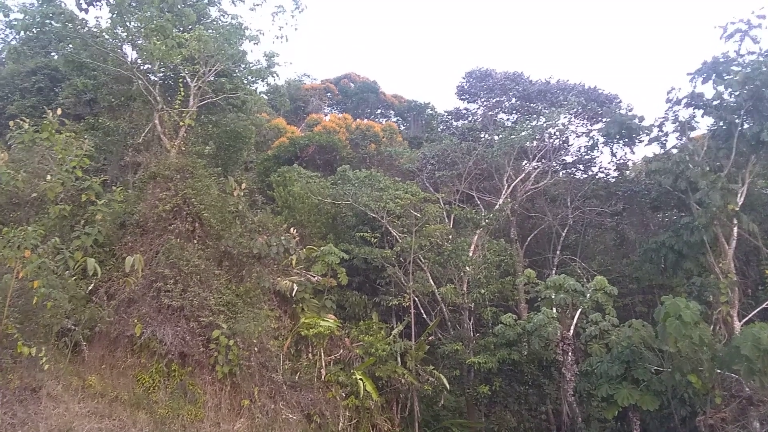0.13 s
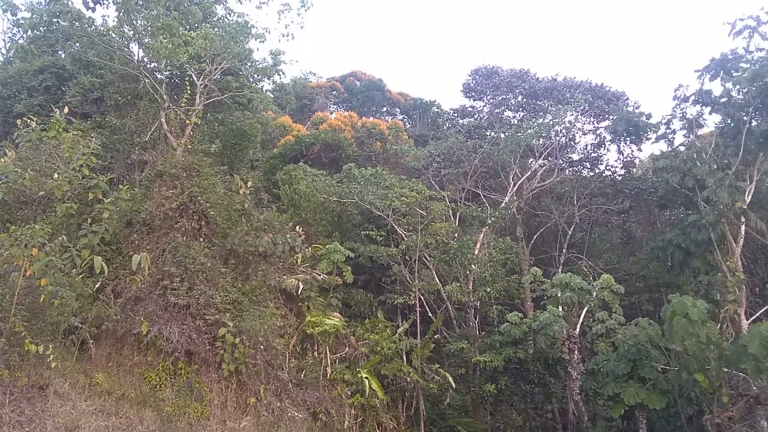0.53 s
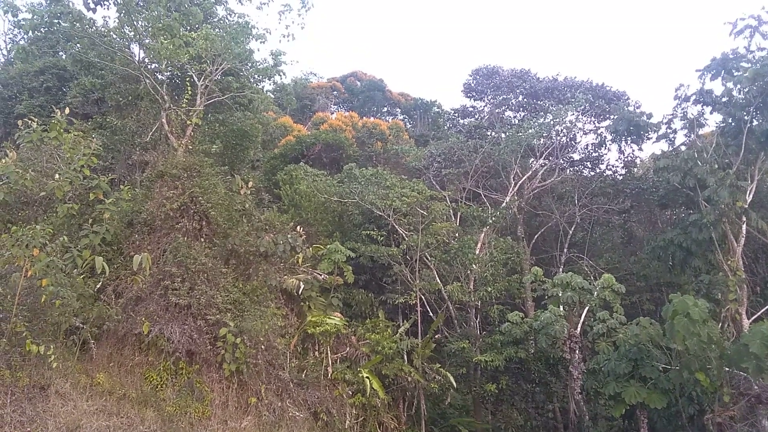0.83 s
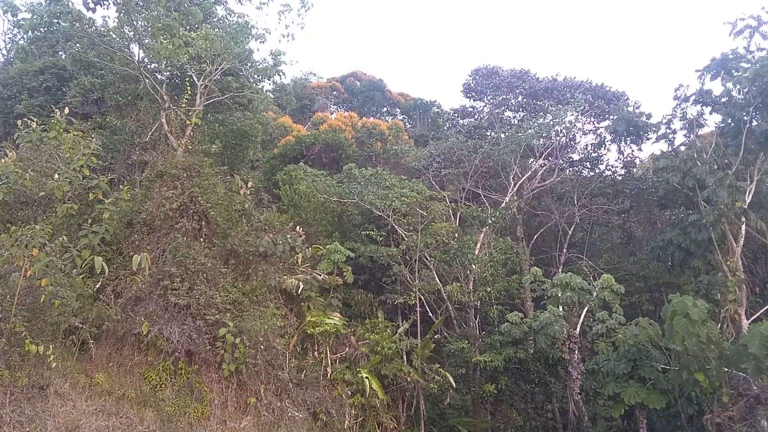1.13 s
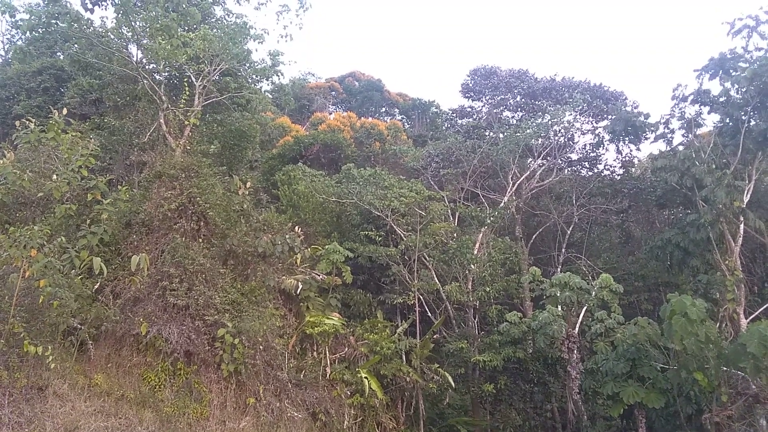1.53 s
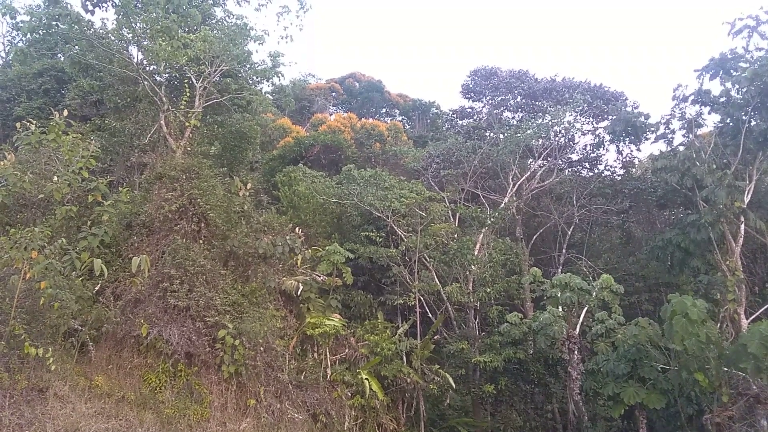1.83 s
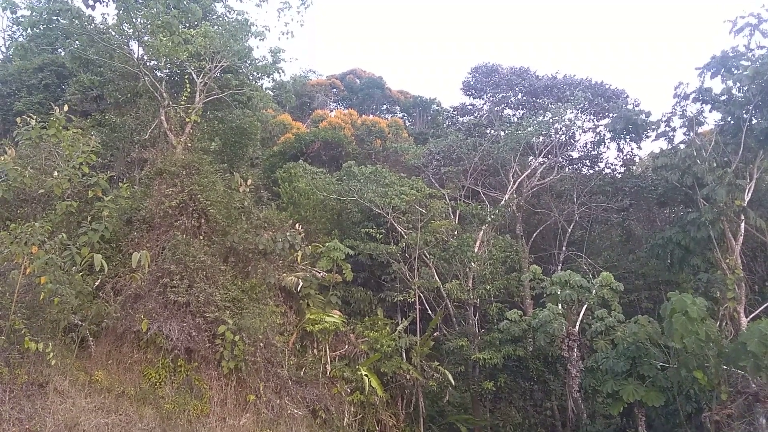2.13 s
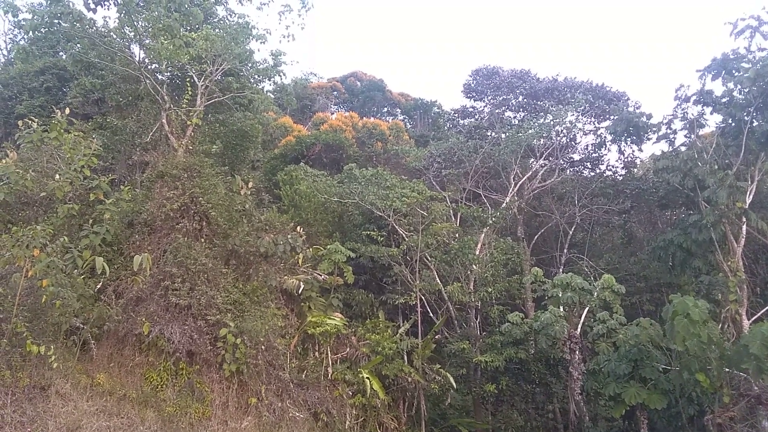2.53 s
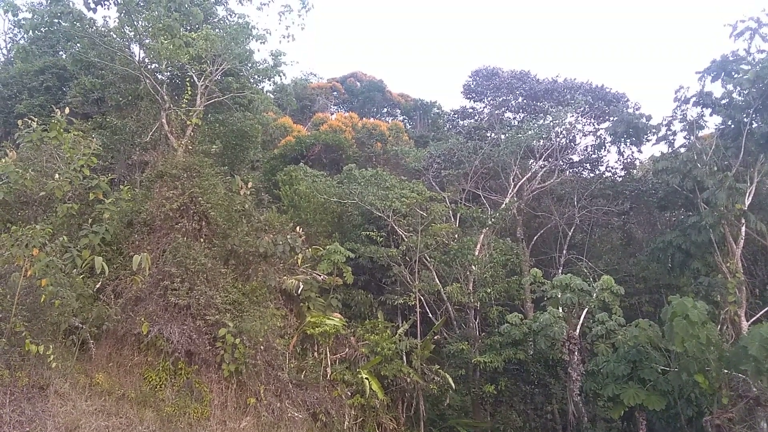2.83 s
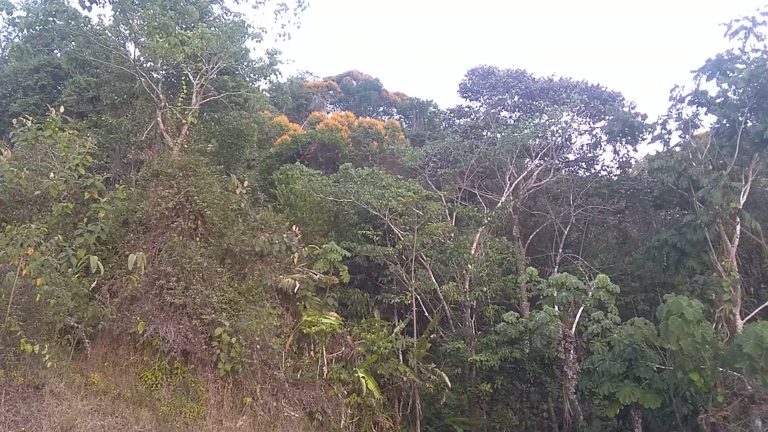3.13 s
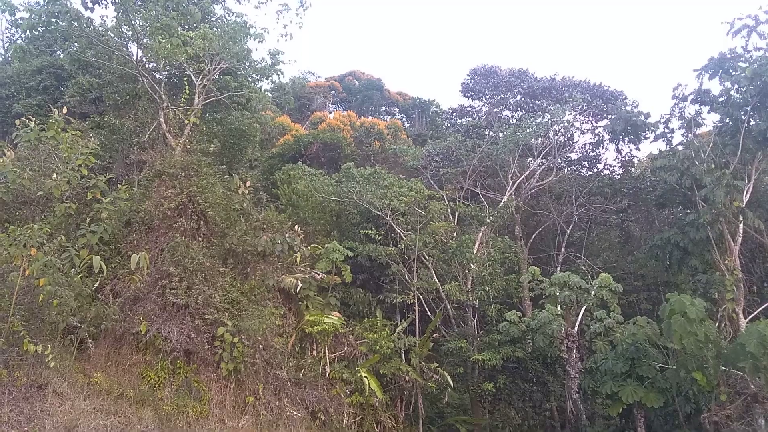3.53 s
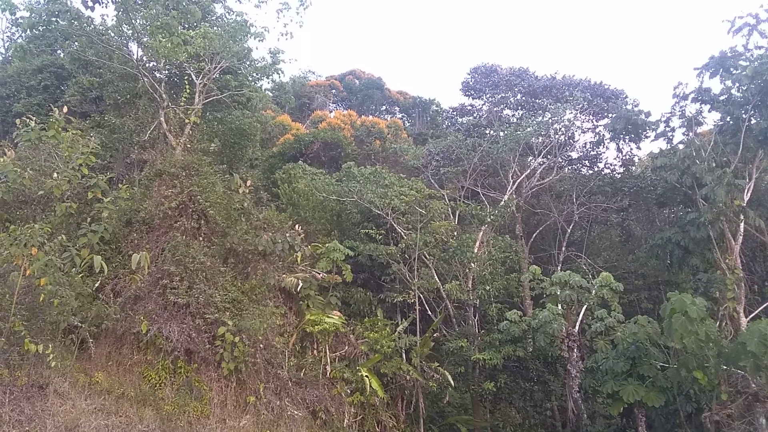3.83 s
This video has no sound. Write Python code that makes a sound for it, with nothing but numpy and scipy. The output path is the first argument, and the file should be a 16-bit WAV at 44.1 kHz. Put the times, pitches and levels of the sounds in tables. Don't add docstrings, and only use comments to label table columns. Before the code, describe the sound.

Howler monkeys, far off in tropical forest, end overlapping gruff roars with one held hoot, then alternate falling pants until they stop; a pulsing cicada and insect hiss continue, with faint bird chirps last, in wide stereo.

```python
import sys
import numpy as np
from scipy import signal
from scipy.io import wavfile
from scipy.ndimage import uniform_filter1d

SR = 44100
rng = np.random.default_rng(int(sys.argv[2]) if len(sys.argv) > 2 else 0)


def gain_from_db(level_db):
    decades = np.asarray(level_db, float) / 20
    return 10 ** decades


def master(y):
    cut = np.clip(np.atleast_2d(y).T, -1, 1)
    pcm = np.round(cut * 32767)
    wavfile.write(sys.argv[1], SR, pcm.astype(np.int16))


N = 176400
T = np.arange(N) / SR
LEAD_IN_S = 0.5


def evened(x):
    return x / np.sqrt(np.mean(x ** 2) + 1e-20)


def read(points, hz):
    f, value = np.transpose(points)
    return np.interp(np.log(hz + 1), np.log(f + 1), value)


def resonate(x, hz, width):
    turn = np.exp(2j * np.pi * np.cumsum(hz * np.ones(len(x))) / SR)
    r = np.exp(-np.pi * width / SR)
    smooth = signal.lfilter([(1 - r) ** 2], [1, -2 * r, r * r], x / turn + 1e-18)
    return 2 * (turn * smooth).real


def hiss(shape, same, lead_s, pan_db, patchy_db):
    frames, hz = N // 256 + 5, np.fft.rfftfreq(1024, 1 / SR)
    a, b, c, d, patches = rng.standard_normal((frames, 513, 5)).T
    patches = uniform_filter1d(uniform_filter1d(patches, size=14, axis=0), size=14, axis=1)
    like = np.clip(read(same, hz), -1, 1)[:, None]
    left = a + 1j * b
    delayed = left * np.exp(-1j * 2 * np.pi * lead_s * hz)[:, None]
    right = like * delayed + np.sqrt(1 - like ** 2) * (c + 1j * d)
    inside = (hz >= shape[0][0] * .8) & (hz <= min(shape[-1][0] * 1.1, 14240))
    colour_db = (read(shape, hz) - 60 * ~inside)[:, None]
    z = np.array([left, right]) * gain_from_db(colour_db + patchy_db * evened(patches))
    sound = signal.istft(z, nperseg=1024, noverlap=768)[1][:, :N]
    return evened(sound) * gain_from_db(np.array([[pan_db / 2], [-pan_db / 2]]))


def syllable(start, length, effort_db, hz, rough, throat, arch, glide, chance):
    growl_hz, growl_depth, jitter, breath = 31.9, 0.51, 0.35, 3
    attack_s, fall_s, wander = .015, 0.027, .018
    t = T[:len(chance[0])]
    rough = np.clip(rough * .82, 0, 1)
    bend = arch * (np.sin(np.pi * np.clip(t / length, 0, 1)) - .6)
    tract = hz * (1 + bend + glide * (np.minimum(t / length, 1.2) - .5))
    drift = evened(uniform_filter1d(uniform_filter1d(chance[1], size=1500), size=1500))
    tract = tract * (1 + wander * rough * drift)
    wobble = evened(uniform_filter1d(chance[0], size=300))
    turns = np.cumsum(tract * throat[0][0] * (1 + jitter * rough ** 2 * wobble / 4)) / SR
    folds = sum(np.cos(2 * np.pi * k * turns) for k in range(1, 5) if k * hz < 2000)
    unsteady = evened(uniform_filter1d(chance[1], size=900))
    shake = np.cumsum(growl_hz * (1 + jitter * unsteady)) / SR
    growl = 1 + growl_depth * np.sqrt(rough) * np.cos(2 * np.pi * shake)
    drive = growl * ((1 - rough) * evened(folds) + breath * rough * chance[2])
    voice = 0
    for k, (ratio, width, db) in enumerate(throat):
        voice = voice + (-1) ** k * gain_from_db(db) * evened(resonate(drive, ratio * tract, width))
    shape = np.clip(t / attack_s, 0, 1) * np.exp(-np.maximum(t - length + fall_s, 0) / fall_s)
    return gain_from_db(effort_db) * shape * voice


def calls(rows, throat, arch, glide):
    out, size = np.zeros(N + 2 * SR), SR // 2
    for row in rows:
        at = round((row[0] + LEAD_IN_S) * SR)
        out[at:at + size] += syllable(*row, throat, arch, glide, rng.standard_normal((3, size)))
    return out


def note(curve, overtone_db):
    s, hz, db = np.transpose(curve)
    t = np.arange(N + 2 * SR) / SR - LEAD_IN_S
    waver = 1 + 0.006 * evened(uniform_filter1d(rng.standard_normal(len(t)), size=600))
    a = 2 * np.pi * np.cumsum(np.interp(t, s, hz) * waver) / SR
    onset = np.clip((t - s[0]) / 0.012 + (s[0] <= 0), 0, 1)
    edge = np.clip((s[-1] - t) / 0.011, 0, 1) * onset
    tone = np.sin(a) + gain_from_db(overtone_db) * np.sin(2 * a)
    return np.sqrt(2) * gain_from_db(np.interp(t, s, db)) * edge * tone


SAG = 0.0401
# start_s, length_s, effort_db, first_resonance_hz, roughness_0_to_1
ROARS = [(-.1, 0.23, -36.5, 427.7, 0.68), (.16, 0.064, -43, 433, 0.99), (.255, 0.042, -33.5, 416.6, 0.51),
         (.31, 0.052, -38, 422, 0.78), (.36, 0.087, -35.5, 410.3, 0.52), (.44, 0.0973, -36.5, 431.2, 0.78),
         (.55, 0.052, -36.5, 432.6, 0.7), (.625, 0.047, -38, 413, 0.74), (.71, 0.096, -37, 413, 0.79),
         (.8, 0.071, -36.5, 399.2, 0.61), (.96, 0.059, -38.5, 385, 0.62), (1.03, 0.057, -41.5, 383.5, 0.78),
         (1.14, 0.096, -41, 397, 0.92), (1.22, 0.088, -43, 383, 0.88)]
# ratio_to_first, width_hz, level_db
ROAR_THROAT = [(1, 117, 1.5), (1.33, 420, -10), (2.015, 270, -8), (0.612, 103, -19.5), (3.15, 170, -23)]


def roars():
    return calls(ROARS, ROAR_THROAT, arch=SAG, glide=-.03)


# start_s, length_s, effort_db, main_resonance_hz, roughness_0_to_1
CRIES = [(-.1, 0.25, -38.5, 904.4, 0.63), (.16, 0.12, -39.5, 960, 0.88), (.26, 0.21, -33, 871.4, 0.73),
         (.46, 0.12, -40, 825, 0.28), (.56, 0.045, -40, 900, 0.72), (.595, 0.038, -37, 948, 0.7),
         (.645, 0.059, -33.5, 825, 0.77), (.64, 0.054, -41.5, 995, 0.36), (0, 0.058, -40, 1026, 0.9),
         (.72, 0.12, -50, 838, 0.88), (.88, 0.17, -49.5, 865, 1), (1.12, 0.15, -45.5, 881, 1.02)]
# ratio_to_main, width_hz, level_db
CRY_THROAT = [(1, 60, -7), (1.139, 80, -18), (1.6, 40, -22.5), (0.6, 405, -13)]


def cries():
    return calls(CRIES, CRY_THROAT, arch=.015, glide=-.02)


# start_s, length_s, effort_db, resonance_hz, roughness_0_to_1
HOOTS = [(.28, 0.219, -52.5, 1397, 0.25), (.67, 0.099, -54.5, 1373, 0.66), (.99, 0.15, -60, 1350, 0.85),
         (-.1, 0.25, -53, 1300, 0.77), (.1, 0.2, -47, 288.5, 0.53), (.88, 0.049, -44, 284.5, 0.52),
         (1.1, 0.14, -53.5, 264.5, 0.2), (1.42, 0.102, -61.5, 1410, 0.64), (1.61, 0.087, -61, 1404, 0.69),
         (1.83, 0.065, -63.5, 1400, 0.77), (2.18, 0.088, -66, 1340, 0.9)]
# ratio, width_hz, level_db
PLAIN_THROAT = [(0.98, 156, -0.5)]


def hoots():
    return calls(HOOTS, PLAIN_THROAT, arch=SAG, glide=.03)


# start_s, length_s, level_db, pitch_hz, roughness_0_to_1
BIRDS = [
    (-.1, 0.23, -54, 2250, 0.5),
    (.2, 0.36, -67.5, 2200, .8),
    (.55, 0.25, -76, 2220, 0.7),
    (3.51, 0.071, -74, 1673, 0.27),
    (3.55, 0.06, -63.5, 1544, .3),
    (3.66, 0.05, -65.5, 1750, 0),
    (3.63, 0.035, -72, 1540, 0.2),
    (3.7, 0.091, -66.5, 1543, 0.38),
    (3.8, 0.046, -73, 1540, 0.45),
]


def birds():
    return calls(BIRDS, PLAIN_THROAT, arch=SAG, glide=0)


# time_s, pitch_hz, level_db
DRONE = [
    (0.0, 219, -45.5),
    (0.098, 187, -50.5),
    (0.2, 214, -60),
]


def drone():
    return note(DRONE, overtone_db=-29)


# frequency_hz, likeness_0_to_1
INSECT_SAME = [(2200, 0.067), (4500, 0.19), (9000, 0.051), (14000, 0.084)]
# frequency_hz, density_db_per_hz
BRIGHT = [(4410, -24), (7500, -55), (8380, -2), (8980, 2.5), (10000, 4), (10600, 1), (12400, 2.5),
          (14100, -8)]
# frequency_hz, density_db_per_hz
BUZZ = [(1760, -13.5), (3000, -23), (3410, 3), (4250, 15), (4700, 7), (5100, 5.5), (5900, 3), (6500, 0.5),
        (8450, -33), (14300, -120)]
# time_s, depth_0_to_1
PUMPS = [
    (-.2, .6),
    (.6, 0.88),
    (1.4, 0.86),
    (2.19, 0.93),
    (2.96, 0.94),
    (3.71, 1.),
]
# time_s, strength_0_to_1
FLUTTERS = [
    (.2, 1),
    (.9, .8),
    (1.86, 0.94),
    (2.63, 1.),
    (3.36, .8),
]


def cicada():
    bright_db, dip_db, buzz_db, rest_db = -52.5, -8.5, -49.5, -13
    pump_width_s, flutter_width_s, whine_lag_s, lead_s = 0.089, 0.077, 0.091, 15 / SR
    pump = sum(depth * np.exp(-.5 * abs((T - s) / pump_width_s) ** 3) for s, depth in PUMPS)
    bright = hiss(BRIGHT, INSECT_SAME, lead_s, pan_db=9.0, patchy_db=1.2)
    bright = bright * gain_from_db(bright_db + dip_db * pump)
    buzz = hiss(BUZZ, INSECT_SAME, lead_s, pan_db=7.0, patchy_db=1.2)
    buzz = buzz * gain_from_db(buzz_db + rest_db * (1 - pump ** .7))
    top = signal.sosfiltfilt(signal.butter(2, 12700, 'high', fs=SR, output='sos'), bright)
    bright = bright - np.clip(0.22 * pump, 0, 1) * top
    late = np.interp(T - whine_lag_s, T, pump)
    between = sum(strength * np.exp(-.5 * ((T - s) / flutter_width_s) ** 2) for s, strength in FLUTTERS)
    rub = rng.standard_normal((2, 2, N))
    whine = evened(np.array([resonate(r, hz=5660, width=210) for r in rub[0]]))
    whine = gain_from_db(-62) * (0.4 + late) * whine
    flutter = evened(np.array([resonate(r, hz=3890, width=630) for r in rub[1]]))
    flutter = gain_from_db(-61.5) * between * flutter
    return bright + buzz + whine + flutter * gain_from_db(np.array([[2.5], [-2.5]]))


# frequency_hz, density_db_per_hz
CHORUS = [(1500, -17.5), (2300, -22), (3300, -4), (4300, -2), (5600, -4), (6400, -4), (8000, -1.5),
          (14500, -10.5)]
# centre_hz, width_hz, level_db
CRICKETS = [
    (3470, 32, -72),
    (4970, 170, -77),
    (5720, 450, -67.5),
    (4760, 89, -73),
    (3270, 65, -74),
    (8660, 1100, -77),
]


def chorus():
    out = gain_from_db(-52) * hiss(CHORUS, INSECT_SAME, 0, pan_db=1.7, patchy_db=2.0)
    for hz, width, db in CRICKETS:
        rub = rng.standard_normal((2, N))
        swell = gain_from_db(db + 2 * evened(uniform_filter1d(rng.standard_normal(N), size=6000)))
        out = out + swell * evened(np.array([resonate(r, hz, width) for r in rub]))
    return out


# frequency_hz, density_db_per_hz
AIR = [(25, -45), (60, 1.5), (110, 4), (250, -7), (500, -14), (1000, -25), (1700, -24.5), (2400, -19)]
# frequency_hz, likeness_0_to_1
AIR_SAME = [(40, 1), (300, 0.86), (1200, 0.11), (2400, 0.17)]


def air():
    return gain_from_db(-56.5) * hiss(AIR, AIR_SAME, 0, pan_db=1.5, patchy_db=.7)


def forest(x):
    t60_s = 0.79
    taps = np.zeros((3, SR))
    at = np.arange(400, SR - 20, 20) + rng.integers(0, 20, (3, (SR - 401) // 20))
    np.put_along_axis(taps, at, rng.choice([-1., 1.], at.shape), 1)
    tail = (taps[0] + 0.27 * taps[1:]) * gain_from_db(-60 * T[:SR] / t60_s)
    return signal.fftconvolve(x[None], tail / np.linalg.norm(tail[0]), axes=1)[:, :len(x)]


# time_s, pitch_hz, level_db
HELD = [
    (.85, 472, -41),
    (.9, 462, -39),
    (1.12, 459, -37),
    (1.15, 453.4, -61),
    (1.2, 454.6, -47.5),
    (1.25, 459.3, -33.5),
    (1.31, 416, -56),
]


def held_note():
    return note(HELD, overtone_db=-16)


# start_s, length_s, effort_db, first_resonance_hz, roughness_0_to_1
PANTS_IN = [
    (1.31, 0.12, -55, 250.9, 0.8),
    (1.53, 0.076, -53, 247, 1.04),
    (1.71, 0.14, -55, 237.4, 0.7),
    (1.92, 0.1, -54.5, 233.6, 0.72),
    (2.1, 0.083, -54, 229.4, 0.4),
    (2.29, 0.12, -55.5, 226.4, 0.7),
    (2.49, 0.074, -53, 223, 0.76),
    (2.68, 0.0976, -67, 214.8, 0.96),
    (2.76, 0.245, -74, 248.6, 0.95),
]
# ratio_to_first, width_hz, level_db
IN_THROAT = [(1, 84, 0.5), (1.42, 196, 5.5), (3.577, 72, -4.5), (2.47, 116, -9)]


def pants_in():
    return calls(PANTS_IN, IN_THROAT, arch=.1, glide=-.2)


# start_s, length_s, effort_db, first_resonance_hz, roughness_0_to_1
PANTS_OUT = [
    (1.4, 0.12, -44, 398.6, 0.83),
    (1.6, 0.086, -43, 383.6, 0.85),
    (1.8, .12, -46.5, 390, 0.95),
    (1.99, 0.11, -45, 384.3, 0.7),
    (2.17, 0.123, -47, 407, 0.71),
    (2.37, 0.11, -48.5, 403.6, 0.98),
    (2.59, 0.077, -49.5, 409.6, 0.56),
]
# ratio_to_first, width_hz, level_db
OUT_THROAT = [(1, 136, -5), (1.646, 67, -9.5), (1.2, 200, -11), (0.694, 77, -6), (2.09, 320, -16.5)]


def pants_out():
    return calls(PANTS_OUT, OUT_THROAT, arch=.1, glide=-.04)


def scene():
    voices = roars() + cries() + hoots() + pants_in() + pants_out()
    voices = signal.sosfilt(signal.butter(4, 1600, fs=SR, output='sos'), voices)
    voices = voices + birds()
    clear = drone() + held_note()
    pan_db, echo_db = -1, -6.5
    direct = (voices + clear) * gain_from_db(np.array([[pan_db], [-pan_db]]))
    heard = direct + gain_from_db(echo_db) * forest(voices + .4 * clear)
    heard[1] = np.roll(heard[1], shift=3)
    start = int(LEAD_IN_S * SR)
    return heard[:, start:start + N] + cicada() + chorus() + air()


def roll_off(x):
    return signal.sosfilt(signal.butter(12, 14280, fs=SR, output="sos"), x)


def record(dry):
    delay = 16
    late = np.pad(dry[::-1], ((0, 0), (delay, 0)))[:, :N]
    late = signal.lfilter(signal.firwin(numtaps=11, cutoff=4300, fs=SR), [1], late)
    return roll_off(dry - .9 * late)


dry = scene()
out = record(dry)
master(out)
```